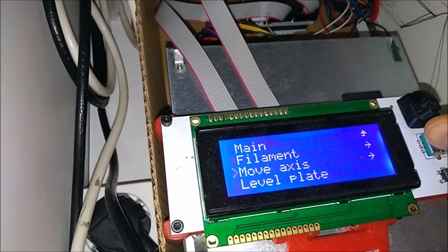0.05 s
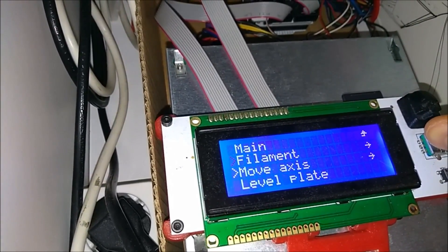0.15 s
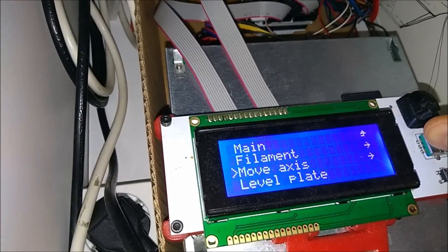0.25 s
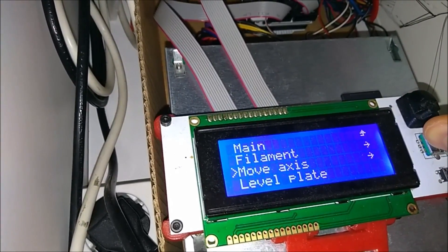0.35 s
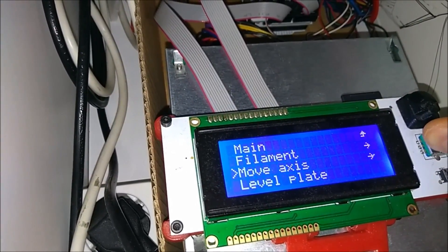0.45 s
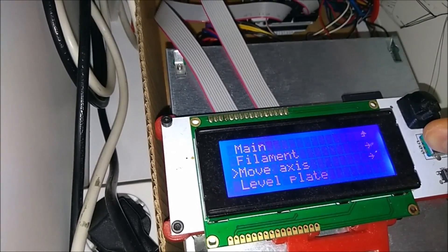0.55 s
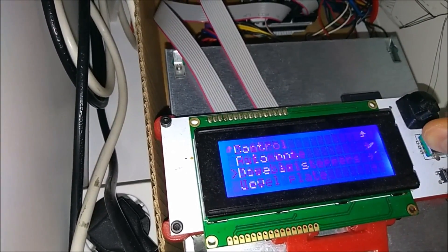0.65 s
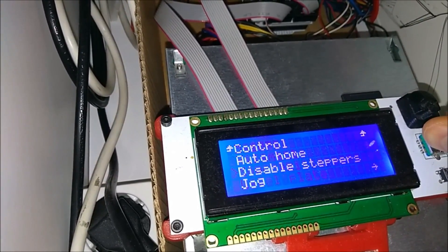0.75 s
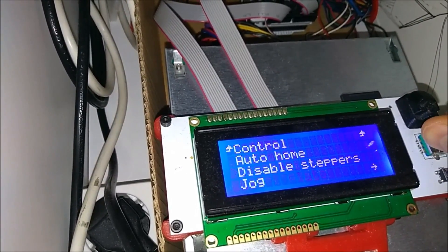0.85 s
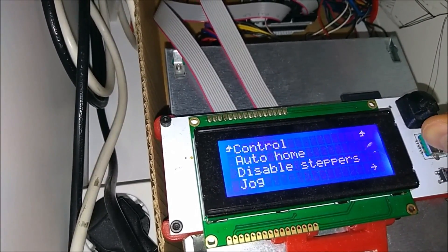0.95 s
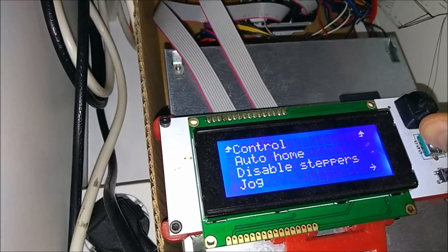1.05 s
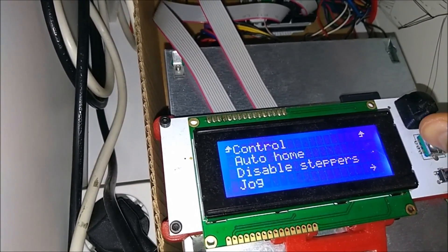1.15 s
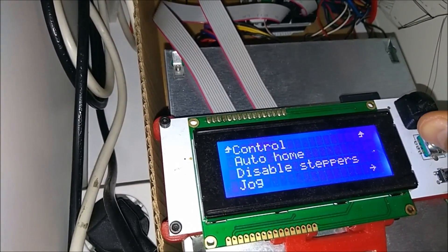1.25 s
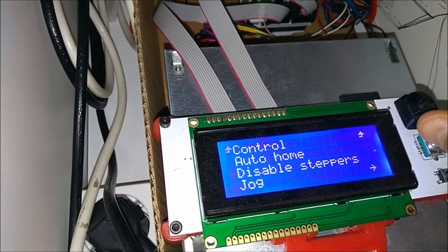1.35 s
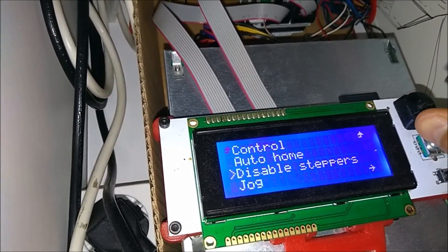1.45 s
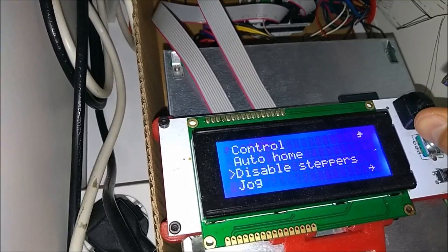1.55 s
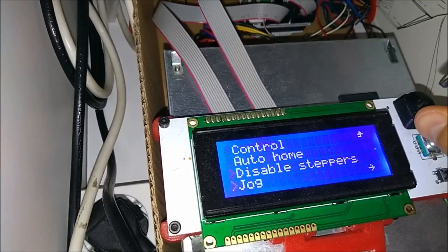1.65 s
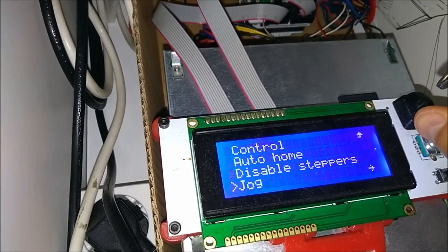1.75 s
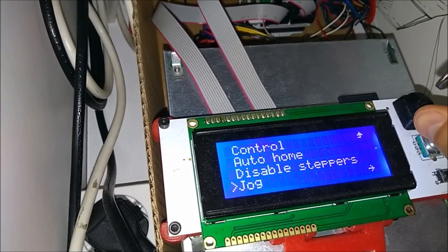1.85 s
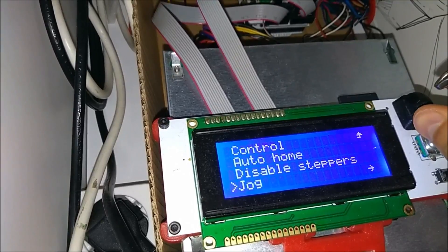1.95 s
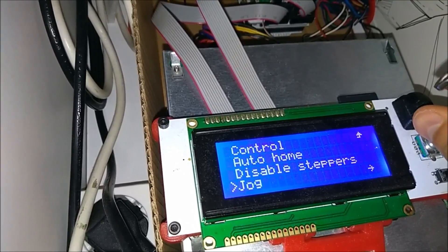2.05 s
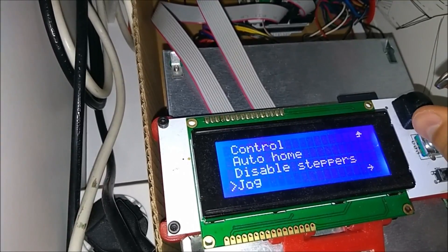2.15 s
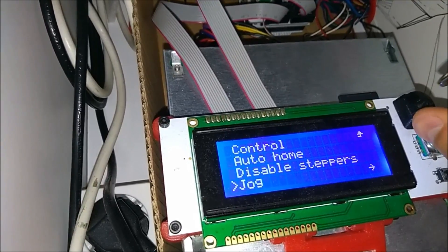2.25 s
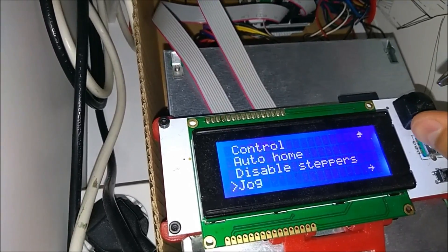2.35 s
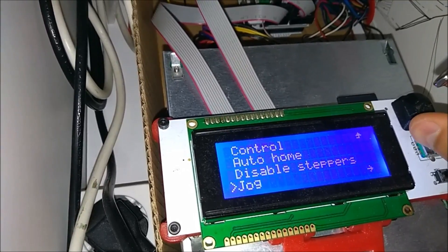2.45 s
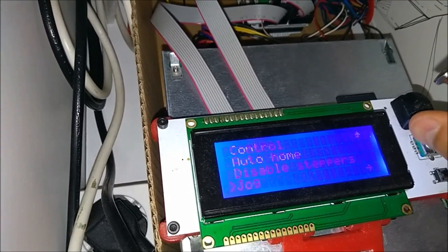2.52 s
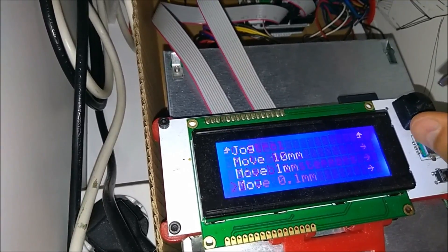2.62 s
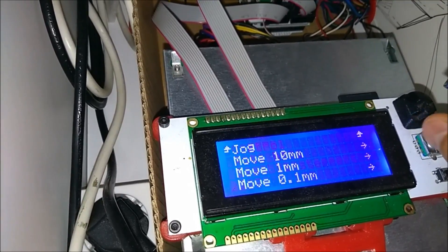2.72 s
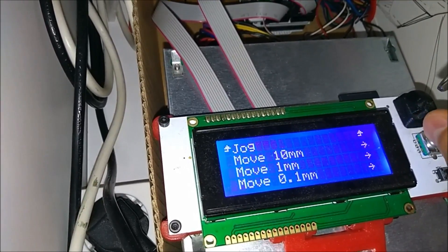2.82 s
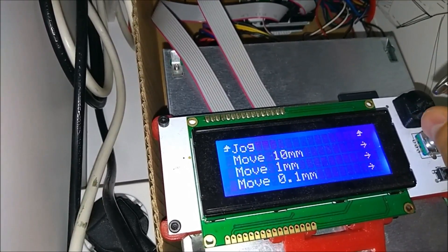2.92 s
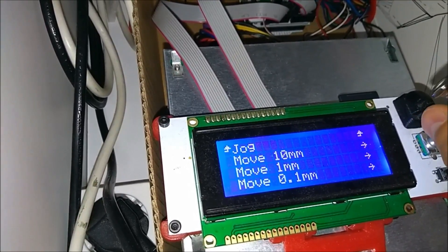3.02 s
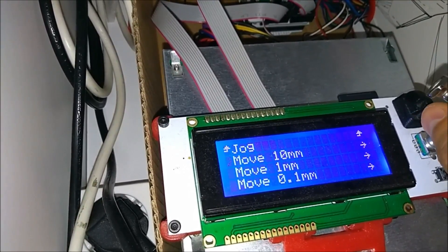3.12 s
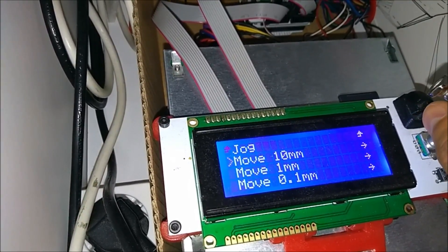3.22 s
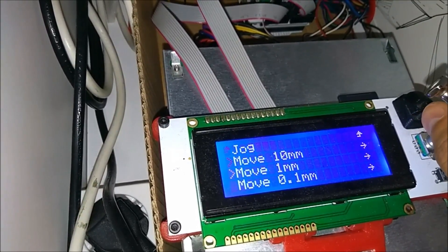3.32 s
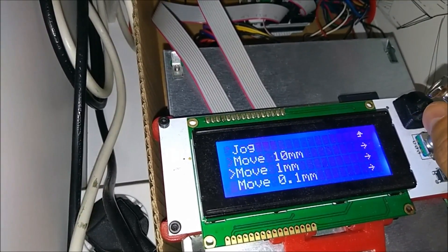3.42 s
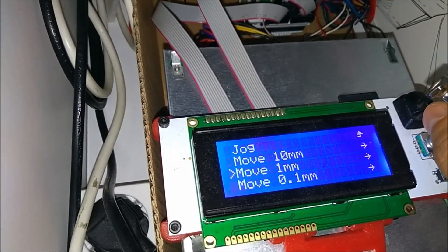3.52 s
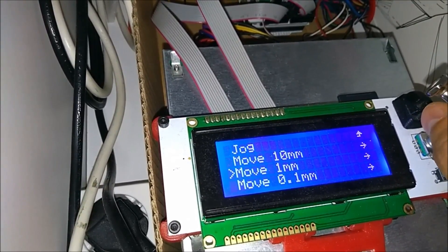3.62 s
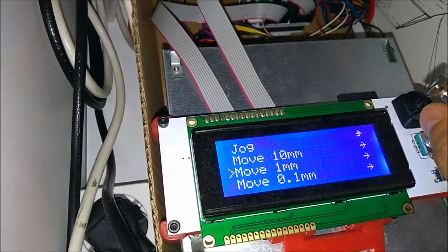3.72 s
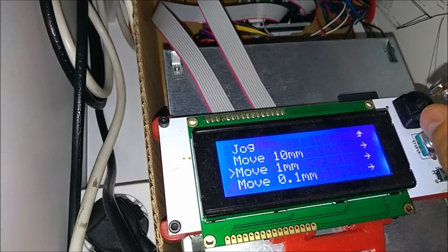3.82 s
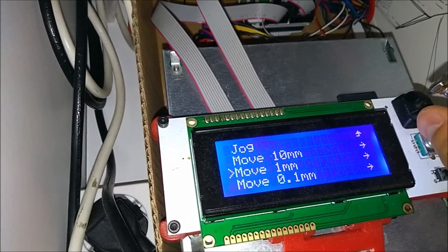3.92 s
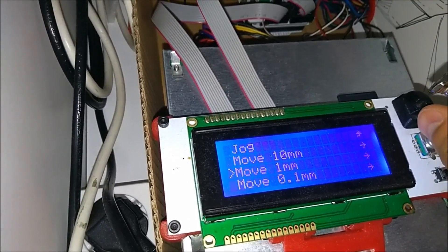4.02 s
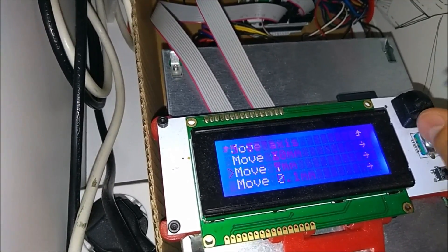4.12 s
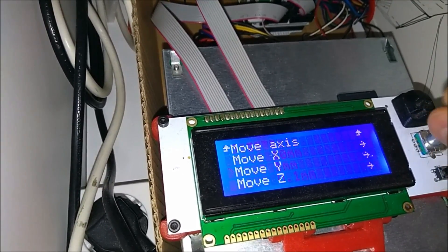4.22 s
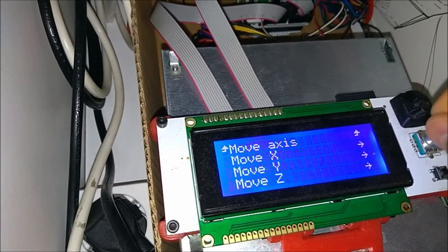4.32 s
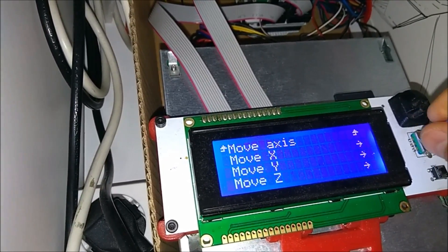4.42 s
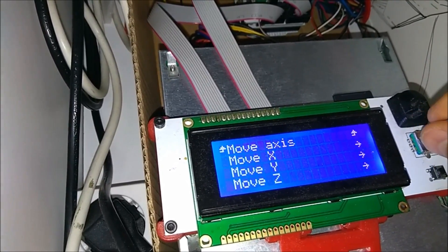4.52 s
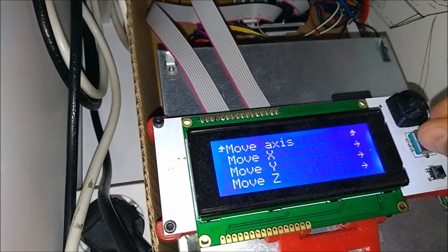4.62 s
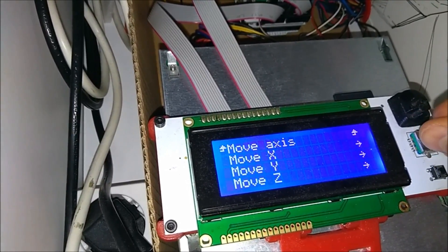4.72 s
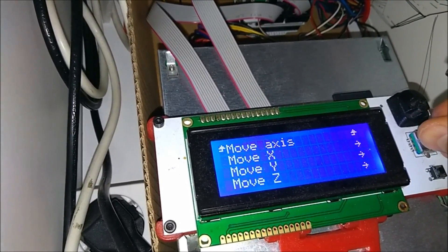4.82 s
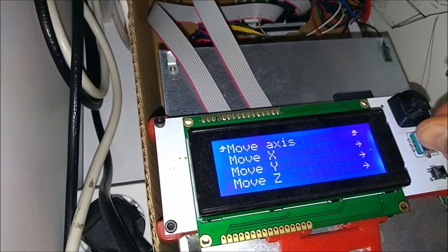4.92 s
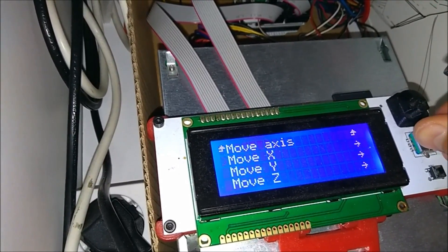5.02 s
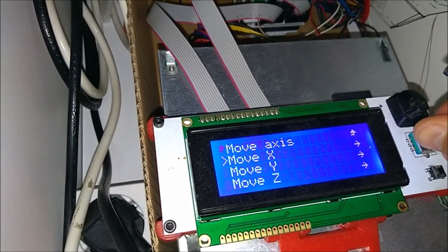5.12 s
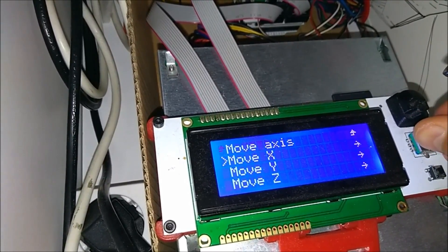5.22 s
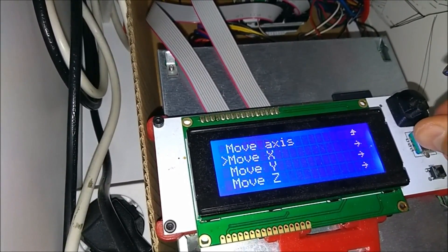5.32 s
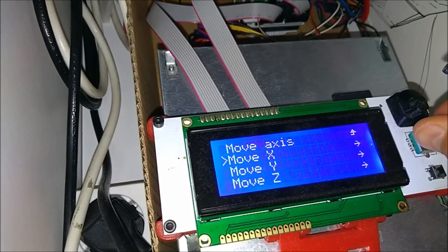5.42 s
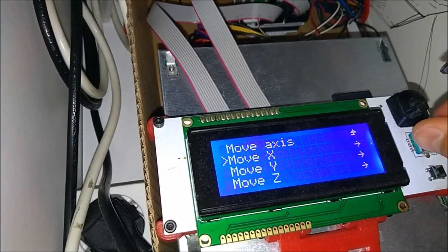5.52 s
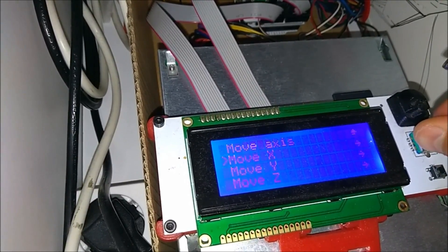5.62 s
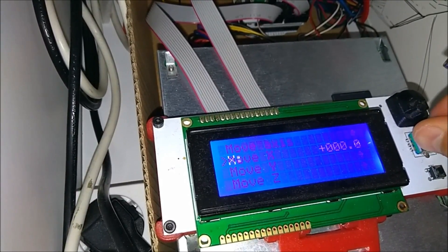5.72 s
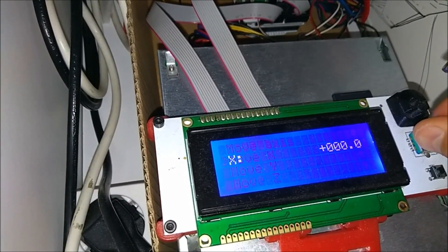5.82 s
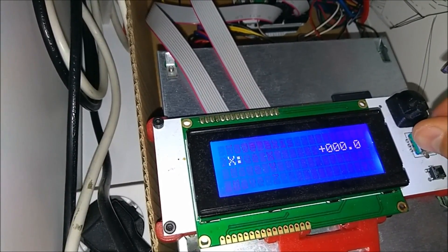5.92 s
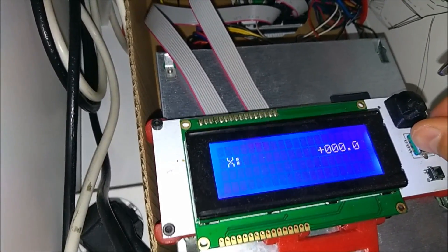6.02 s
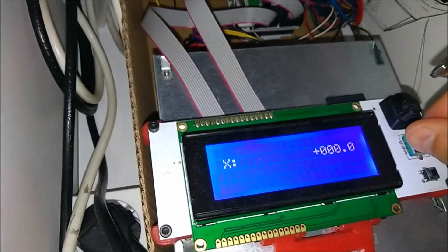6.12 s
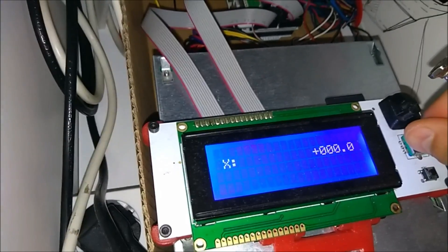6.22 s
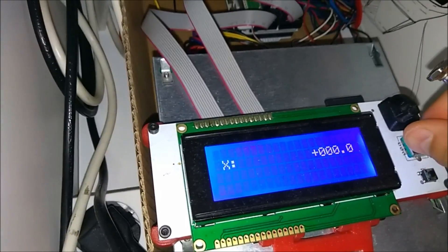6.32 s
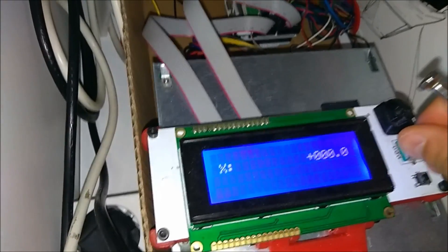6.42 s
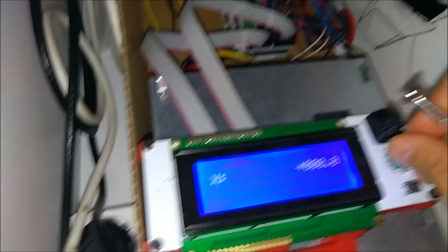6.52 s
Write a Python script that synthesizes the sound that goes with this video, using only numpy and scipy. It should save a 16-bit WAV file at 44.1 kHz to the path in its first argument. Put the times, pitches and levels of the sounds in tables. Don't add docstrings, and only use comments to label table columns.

```python
import sys
import numpy as np
from scipy import signal
from scipy.fft import rfft, irfft, next_fast_len
from scipy.io import wavfile
from scipy.ndimage import uniform_filter1d

SR = 44100
rng = np.random.default_rng(int(sys.argv[2]) if len(sys.argv) > 2 else 0)


def attenuation_scalar(level_db):
    decades = np.asarray(level_db, float) / 20
    return 10 ** decades


def log_audio(samples):
    frames = np.atleast_2d(samples).T
    limited = np.clip(frames, -1, 1)
    pcm = np.round(limited * 32767).astype(np.int16)
    wavfile.write(sys.argv[1], SR, pcm)


N = 289279
SPAN = 10000


def at_hz(points, hz):
    table = np.array(points)
    return np.interp(np.log(hz + 1), np.log(table[:, 0]), table[:, 1])


def octaves(hz):
    return np.log2((hz + 100) / 3000)


def coloured(x, points, tilt_db=0):
    size = 2 * len(x)
    hz = np.arange(size // 2 + 1) * SR / size
    level_db = at_hz(points, hz) + tilt_db * octaves(hz)
    cepstrum = irfft(level_db * np.log(10) / 20, size)
    cepstrum[1:size // 2] *= 2
    response = np.exp(rfft(cepstrum[:size // 2], size))
    return irfft(rfft(x, size) * response, size)[:len(x)]


def rms_one(x):
    return x / np.sqrt(np.mean(x ** 2) + 1e-20)


def peak_one(x):
    return x / (np.abs(x).max() + 1e-20)


def add(out, sound, start_s, level_db):
    i = round(start_s * SR)
    out[max(i, 0):i + SPAN] += attenuation_scalar(level_db) * peak_one(sound)[max(-i, 0):N - i]


def drift(rate_hz):
    r = np.exp(-80 * np.pi * rate_hz / SR)
    noise = rng.standard_normal(N // 40 + 2002)
    slow = signal.lfilter([1], [1, -2 * r, r * r], noise)[2000:]
    return np.interp(np.arange(N) / 40, np.arange(len(slow)), rms_one(slow - slow.mean()))


# pitch_hz [Hz], level_db [dB per Hz]
AIR = [(70, -46), (125, -17.5), (275, -2.5), (300, -12.5), (360, -9.5), (450, -19.5), (700, -11),
       (1200, -14), (1950, -16), (3000, -19.5), (3800, -19.5), (4350, -26.5), (5760, -23), (14000, -36)]
# pitch_hz [Hz], width_hz [Hz], level_db [dB rms]
BOX = [(66, 23, -81), (108, 50, -78), (232, 20, -79.5), (328, 110, -81.5), (684, 230, -78.5),
       (860, 120, -82.5), (5800, 2700, -78), (1300, 250, -86.5), (1940, 196, -87.5), (3780, 59.7, -90)]
# pitch_hz [Hz], level_db [dB rms], wander_hz [Hz]
HUM = [(97.6, -69.5, 1.2), (274, -74.5, 8.6), (625.9, -86, 1), (717, -78.5, 4.6), (880, -83, 3.3),
       (1255, -82.5, 8.5), (1900, -83, 8), (2478, -89, 23)]
# pitch_hz [Hz], level_db [dB rms]
WHINE = [(3262, -95.5), (3456, -95), (3784, -95), (5663, -96)]


def fan():
    size = next_fast_len(N)
    hz = np.arange(size // 2 + 1) * SR / size
    white = rfft(rng.standard_normal((3, size)))
    air = rms_one(irfft(white[2] * attenuation_scalar(at_hz(AIR, hz)), size)[:N])
    out = attenuation_scalar(-68 + 1.2 * drift(3.8)) * air
    for k, (centre_hz, width_hz, level_db) in enumerate(BOX):
        shape = 1 / (1 + ((hz - centre_hz) / (width_hz / 2)) ** 2)
        resonance = rms_one(irfft(white[k % 2] * shape, size)[:N])
        out += attenuation_scalar(level_db + 3.4 * drift(4.9)) * resonance
    for pitch_hz, level_db, wander_hz in HUM + [(*row, 12.0) for row in WHINE]:
        phase = 2 * np.pi * np.cumsum(pitch_hz + wander_hz * drift(3.6)) / SR
        out += np.sqrt(2) * attenuation_scalar(level_db + 1.1 * drift(2.5)) * np.sin(phase)
    return out


def rattle(t60_s, hold_s, uneven_db):
    t = np.arange(SPAN) / SR
    decay_db = -60 * np.maximum(t - hold_s, 0) / t60_s - 260 * np.minimum(t, hold_s)
    swell = np.minimum(t / 0.0013, 1) * attenuation_scalar(decay_db)
    return swell * rng.standard_normal(SPAN) * attenuation_scalar(uneven_db * rng.exponential(1, SPAN))


def struck(force, modes, tilt_db, spread_db, signs=None):
    out = 0
    draws = rng.standard_normal((len(modes), 2))
    if signs:
        draws[:, 1] = signs
    for (hz, level_db, t60_s), (luck, sign) in zip(modes, draws):
        r, w = attenuation_scalar(-60 / (t60_s * SR)), 2 * np.pi * hz / SR
        gain = np.sign(sign) * attenuation_scalar(level_db + tilt_db * np.log2(hz / 3000) + spread_db * luck)
        out = out + signal.lfilter([0, gain * np.sin(w)], [1, -2 * r * np.cos(w), r * r], force + 1e-18)
    return peak_one(out)


# pitch_hz [Hz], level_db [dB], t60_s [s]
BOARD = [(200.6, -12, 0.079), (270, -18, 0.051), (450, -14, .05), (708, -6.5, .04), (839, 0.5, 0.022),
         (1097, -11, 0.07), (1356, -2.5, .04), (1390, -5, .05), (1648, -7.5, .04), (1797, -1.5, 0.029),
         (2005, 1.5, 0.023), (2210, -6.5, 0.02), (2610, -10.5, .03), (2560, -8, 0.022)]


def board(force, tilt_db, spread_db):
    return struck(force, BOARD, tilt_db, spread_db)


# pitch_hz [Hz], level_db [dB per Hz]
SPRING = [(4900, -26), (5250, -7), (5500, -7.5), (5800, -4.5), (6050, -6.5), (6400, -29.5)]


def spring(t60_s=0.17):
    return peak_one(coloured(rattle(t60_s, 0, uneven_db=0.7), SPRING))


# pitch_hz [Hz], t60_s [s]
ROOM_T60 = [(200, 0.4), (1000, 0.26), (3000, 0.2), (5500, 0.21), (8000, 0.27), (12500, .22)]


def echo(colour, tilt_db):
    t = np.arange(SPAN) / SR
    edges = 150 * 2 ** np.arange(0, 7.1, .5)
    low_hz, high_hz = edges[:-1], edges[1:]
    hz = np.arange(SPAN // 2 + 1) * SR / SPAN
    noise = rfft(rng.standard_normal(SPAN)) * attenuation_scalar(at_hz(colour, hz) + tilt_db * octaves(hz))
    inside = (hz >= edges[:-1, None]) & (hz < edges[1:, None])
    bands = irfft(noise * inside, SPAN)
    t60_s = at_hz(ROOM_T60, np.sqrt(low_hz * high_hz))
    tail = np.sum(bands * attenuation_scalar(-60 * t / t60_s[:, None]), axis=0)
    return np.minimum(t / 0.012, 1) * tail / np.std(bands.sum(axis=0))


# start_s [s], level_db [dB peak], tilt_db [dB per octave]
TICKS = [(-0.004, -29.5, -6.5), (1.1147, -56.5, -0.5), (1.1424, -52.5, 10), (1.283, -52.5, -2),
         (1.3456, -45, 2), (1.3844, -56, 7), (1.5037, -53, -2), (1.9276, -51.5, -1.5), (2.9802, -46.5, -4),
         (3.1026, -49.5, -14), (3.248, -48.5, -4), (4.666, -50.5, -6.5), (4.9835, -32.5, 2.5),
         (5.0205, -26.5, 0.5), (4.205, -56, 1)]
# pitch_hz [Hz], level_db [dB per Hz]
TICK = [(300, -70), (1200, -37), (2200, -8.5), (3000, 6), (3700, 10), (4800, 11), (5800, 4.5), (6600, 1),
        (8000, 5.5), (10000, -1.5), (13900, -6.5)]


def detents():
    out, t = np.zeros(N), np.arange(SPAN) / SR
    for start_s, level_db, tilt_db in TICKS:
        spring_db = -6 - 0.22 * tilt_db - 0.2 * (level_db + 51)
        tilt_db = np.clip(tilt_db - 0.06 * (level_db + 22), -7, 8)
        rise_s = 0.0026 * attenuation_scalar(-0.2 * (level_db + 43))
        force = rattle(0.073, 0.0009, uneven_db=3.0) * (attenuation_scalar(-9) + attenuation_scalar(-60 * t / 0.017))
        force = force * np.minimum(t / rise_s, 1)
        snap = peak_one(coloured(force, TICK, tilt_db)) + attenuation_scalar(-20.5) * board(force, -2.2, spread_db=8.0)
        tail = attenuation_scalar(-28.0) * echo(TICK, tilt_db) + attenuation_scalar(spring_db) * spring()
        add(out, snap + tail, start_s - .0005, level_db)
    return out


# pitch_hz [Hz], level_db [dB per Hz]
WALLS = [(200, -17.5), (300, -5.5), (450, -11), (700, -4), (1400, -6.5), (2300, -10.5), (3700, -11.5),
         (4600, -15), (5800, -12.5), (8000, -15.5), (10000, -21.5), (14000, -23.5)]


def dome(rows, colour, tilt_db, hold_s, board_db, echo_db):
    out, t = np.zeros(N), np.arange(SPAN) / SR
    push_band = signal.butter(2, 749, fs=SR, output="sos")
    radiated = signal.butter(2, 130, "high", fs=SR, output="sos")
    for start_s, level_db, t60_s, spring_db, push_db in rows:
        force = rattle(t60_s, hold_s, uneven_db=2.5)
        knock = attenuation_scalar(board_db) * board(force, tilt_db, spread_db=3.0)
        knock = knock + (attenuation_scalar(push_db) - 1) * signal.sosfilt(push_band, knock)
        knock = signal.sosfilt(radiated, knock)
        sharp = force * (attenuation_scalar(-5) + attenuation_scalar(-60 * t / 0.022))
        crack = peak_one(coloured(sharp, colour, tilt_db))
        tail = attenuation_scalar(echo_db) * echo(WALLS, 0.31 * tilt_db) + attenuation_scalar(spring_db) * spring()
        add(out, peak_one(knock + crack) + tail, start_s + 0.00088, level_db)
    return out


# pitch_hz [Hz], level_db [dB per Hz]
CRACK_BACK = [(200, -23), (700, -5.5), (1400, 1.5), (2100, -2.5), (2700, -12), (3500, -3), (4600, -20),
              (5700, -19), (8000, -12.5), (10000, -26), (13900, -37.5)]
# start_s [s], level_db [dB peak], t60_s [s], spring_db [dB]
CREAKS = [
    (0.529, -45.5, 0.044, -18),
    (0.683, -40, 0.057, -20),
    (0.713, -34.5, 0.15, -25),
    (2.401, -50, 0.048, -15),
    (3.968, -44, .05, -14.5),
    (5.565, -49.5, .05, -16),
    (2.596, -48.5, .05, -20),
]


def creaks():
    rows = [(*row, -3.0) for row in CREAKS]
    return dome(rows, CRACK_BACK, tilt_db=2.5, hold_s=.008, board_db=-7, echo_db=-24)


# start_s [s], level_db [dB peak], t60_s [s], push_db [dB]
SNAPS = [
    (0.537, -8, 0.06, 2),
    (2.408, -9.5, 0.073, -15.5),
    (3.974, -8.5, 0.079, 9),
    (5.569, -10, 0.09, -1.5),
]
# pitch_hz [Hz], level_db [dB per Hz]
CRACK = [(200, -34.5), (500, -13), (1400, -6.5), (2200, -3), (3500, 2), (4200, -6.5), (4800, -3),
         (5400, -20), (7600, -6.5), (9000, -15.5), (13900, -35.5)]


def presses():
    rows = [(start_s, level_db, t60_s, -21.5, push_db) for start_s, level_db, t60_s, push_db in SNAPS]
    return dome(rows, CRACK, tilt_db=1.5, hold_s=0.0059, board_db=-7, echo_db=-24)


# start_s [s], level_db [dB peak], swell_s [s]
THUDS = [(0.546, -46.5, 0.026), (0.699, -39, 0.0214), (1.549, -56, 0.017), (2.418, -43, 0.021),
         (2.491, -54, 0.021), (2.598, -41.5, 0.026), (2.999, -52, 0.01), (4.009, -33.5, 0.01),
         (4.113, -35, 0.019), (5.016, -50, 0.012), (5.586, -42, 0.02), (5.737, -41, 0.026)]


def frame():
    out, t = np.zeros(N), np.arange(SPAN) / SR
    mode_gains = attenuation_scalar(np.array([0, -11, -13]))
    for (start_s, level_db, swell_s), turns in zip(THUDS, rng.random((len(THUDS), 3))):
        pitch_hz = 85 + 0.48 * (level_db + 44.5)
        modes = np.sin(2 * np.pi * (np.outer([1, 2.1, .55], pitch_hz * t) + turns[:, None]))
        swell = (t / swell_s * np.exp(-t / swell_s)) ** 2
        add(out, mode_gains @ modes * swell, start_s, level_db)
    return out


# start_s [s], level_db [dB peak], low_db [dB per octave towards the low modes]
KICKS = [
    (0.5524, -5.5, 2),
    (2.4829, -5.5, 0),
    (4.0196, -5, -1),
    (5.5983, -5, 5),
]
# pitch_hz [Hz], level_db [dB], t60_s [s]
DISC = [(2677, -6.5, 0.056), (2820, -10, 0.034), (3130, -6, 0.029), (3290, -10, 0.07), (3590, -3, 0.035),
        (4110, -12, 0.053), (4190, 2, 0.058), (4570, -7, 0.048), (4650, -11.5, 0.16), (4780, -8, .045),
        (4940, 3, 0.04), (5170, -9, 0.02)]
DISC_SIGNS = [1, -1, 1, -1, -1, -1, 1, 1, -1, 1, -1, 1]
# pitch_hz [Hz], level_db [dB], t60_s [s]
RIM = [(9600, -6, .03), (10000, -6, .03), (13300, -3, .02), (13550, -3, .025)]
# pitch_hz [Hz], level_db [dB per Hz]
DISC_ECHO = [(1060, -50), (1800, -22.5), (2170, -18.5), (2730, -4.5), (3370, -5.5), (4150, 0), (4910, -1),
             (5430, -7), (9000, -27), (11700, -56.5), (19800, -120)]


def sounder():
    out, t = np.zeros(N), np.arange(SPAN) / SR
    cavity = signal.cheby2(5, 32, [2400, 5520], "band", fs=SR, output="sos")
    damping = attenuation_scalar(-10 * np.clip((t - .014) / 0.0051, 0, 1))
    for start_s, level_db, low_db in KICKS:
        pull = (t == 0) + 0.055 * peak_one(rattle(.004, 0.00029, uneven_db=0.5))
        force = pull - 0.32 * np.roll(pull, round(.0031 * SR))
        disc = struck(force, DISC, -low_db, spread_db=1.77, signs=DISC_SIGNS)
        ring = peak_one(signal.sosfilt(cavity, disc) * damping)
        rim = attenuation_scalar(-35.5) * struck(force, RIM, 0, spread_db=5.5)
        tail = attenuation_scalar(-28.5) * echo(DISC_ECHO, 0) + attenuation_scalar(-34) * spring(0.33)
        add(out, ring + rim + tail, start_s - .0008, level_db)
    return out


# start_s [s], level_db [dB peak], t60_s [s], spring_db [dB], push_db [dB]
RELEASES = [
    (0.691, -24.5, 0.052, -15.5, 0.5),
    (2.601, -18, 0.084, -43, -2.5),
    (4.118, -16, 0.026, -18, 3),
    (5.735, -19.5, 0.089, -21.5, -2),
]


def releases():
    return dome(RELEASES, CRACK_BACK, tilt_db=-0.22, hold_s=.015, board_db=-8.5, echo_db=-25.5)


def scene():
    switch = attenuation_scalar(-4.5) * presses() + releases() + creaks()
    return (switch + attenuation_scalar(-2.0) * sounder() + attenuation_scalar(-2.0) * detents() + frame() + fan())[None]


# start_s [s, centre], share [part of the partials weakened, 0-1]
THINNED = [(.053, 0.7), (.712, .8), (1.845, 0.5), (2.05, .72), (2.24, 0.6), (2.535, 0.6), (2.575, 0.8),
           (2.93, .6), (3.378, .65), (4.095, .45), (4.35, .72), (4.5, .68), (5.29, .7), (6.355, .7),
           (6.4, .68)]


def thin_treble(x):
    out, size = x.copy(), 2048
    hz = np.arange(size // 2 + 1) * SR / size
    treble = (hz > 2200) & (hz < 14200)
    for start_s, share in THINNED:
        i = round(start_s * SR) - size // 2
        spectrum = rfft(out[i:i + size] * np.hanning(size))
        power = uniform_filter1d(np.abs(spectrum) ** 2, size=5) * hz ** .9
        weak = treble & (power < np.quantile(power[treble], np.clip(share, 0, 1)))
        out[i:i + size] -= (1 - attenuation_scalar(-7)) * irfft(spectrum * weak, size)
    return out


def band_limit(x):
    return signal.sosfilt(signal.butter(12, 15450, fs=SR, output="sos"), x)


def record(dry):
    top = signal.ellip(8, .5, 70, 14250, fs=SR, output="sos")
    mix = thin_treble(signal.sosfilt(top, dry[0]))[None]
    return band_limit(mix)


dry = scene()
out = record(dry)
log_audio(out)
```